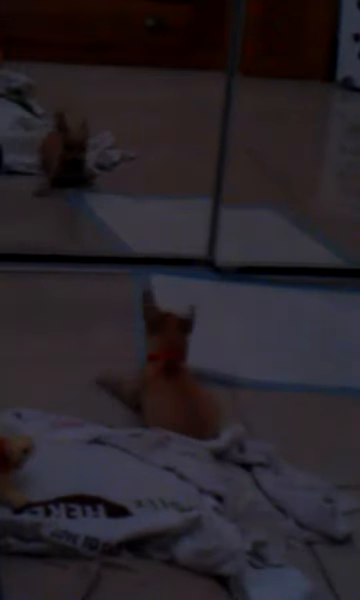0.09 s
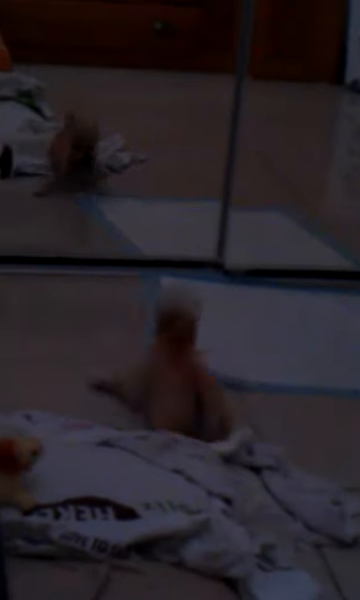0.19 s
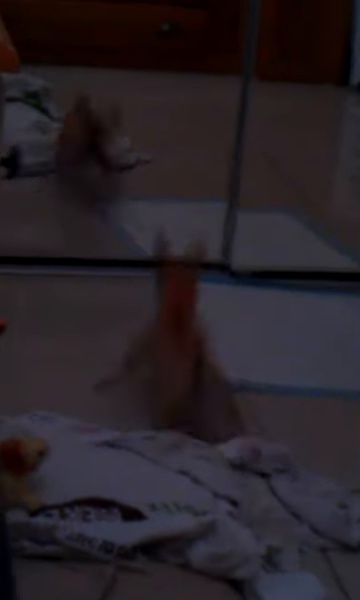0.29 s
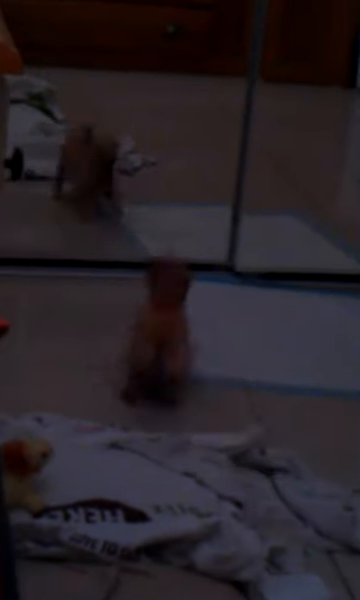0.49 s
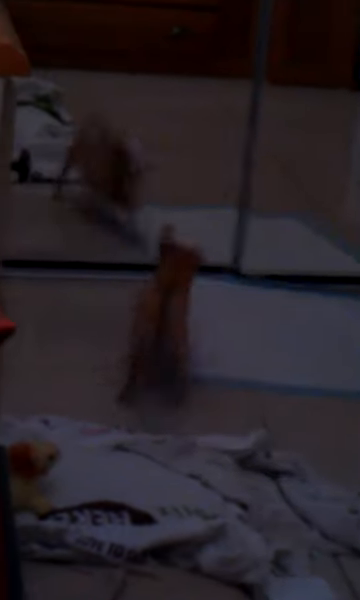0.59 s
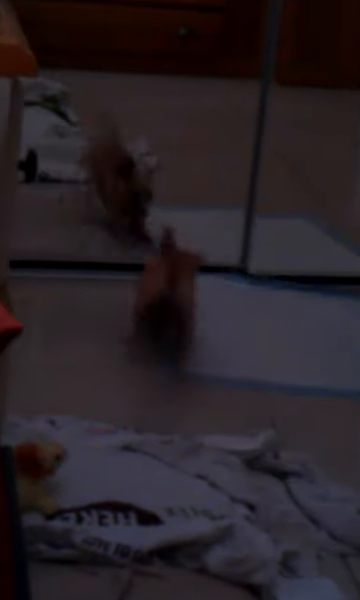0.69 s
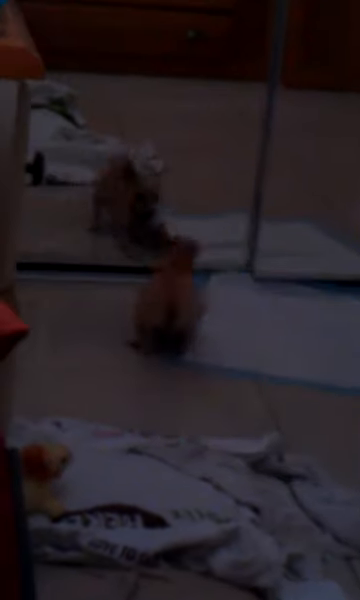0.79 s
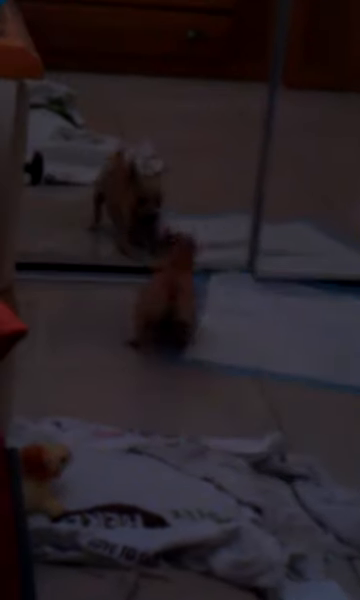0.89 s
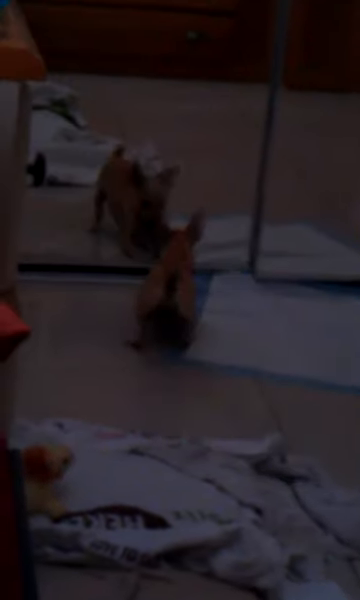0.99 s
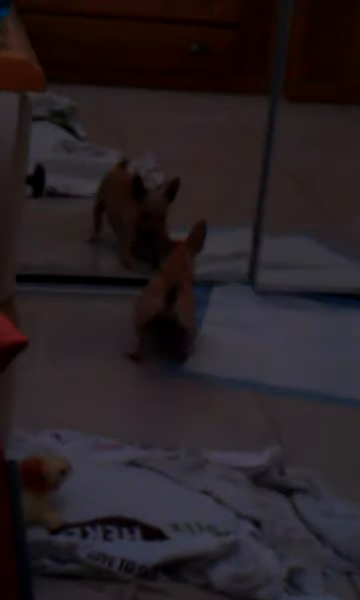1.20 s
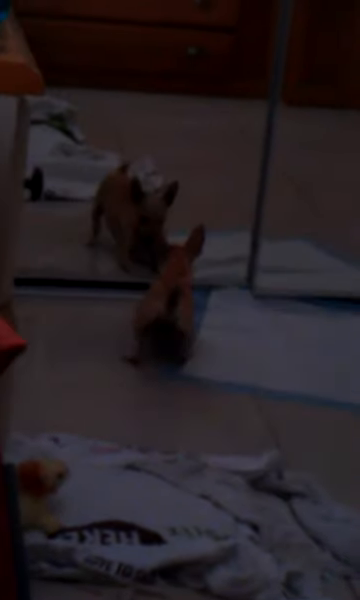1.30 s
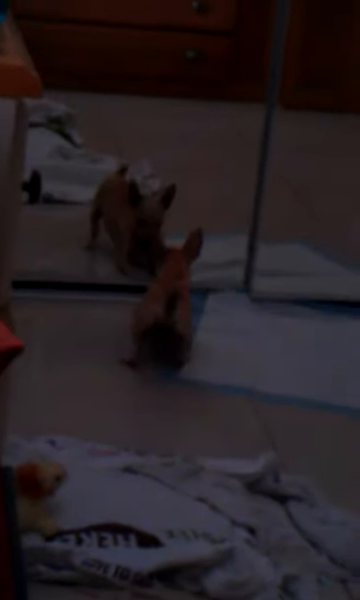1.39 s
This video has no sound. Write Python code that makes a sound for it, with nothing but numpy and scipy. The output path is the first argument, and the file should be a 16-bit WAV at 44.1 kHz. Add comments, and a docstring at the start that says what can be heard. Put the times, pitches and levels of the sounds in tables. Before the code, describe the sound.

Close to the microphone in a quiet room, a small dog lets out two muffled, huffing woofs, the second softer. Between and after them its paws scuff and slide on the hard floor, with claw ticks and light steps.

```python
"""A small dog gives two muffled, closed-mouth woofs, each with a puff of air through the nose.
Between and after them it jumps up, paws scuffing and sliding, then settles with a few light steps.
The place is a quiet, hard-floored room with faint background noise. A small microphone with a peak
in the high treble stands near enough for the dog to be louder than its reverberation."""
import sys
import numpy as np
from scipy import signal
from scipy.fft import rfft, irfft
from scipy.io import wavfile
from scipy.ndimage import uniform_filter1d

SR = 44100
rng = np.random.default_rng(int(sys.argv[2]) if len(sys.argv) > 2 else 0)


def file_out(sig):
    """Save sig as 16-bit WAV at sys.argv[1]."""
    # one column per channel
    cols = np.atleast_2d(sig).T
    # limit, then scale
    lim = np.clip(cols, -1, 1)
    pcm = np.round(lim * 32767).astype(np.int16)
    wavfile.write(sys.argv[1], SR, pcm)


N = 63945
T = np.arange(N) / SR


def from_db(db):
    """Decibels to gain."""
    return 10 ** (np.asarray(db) / 20)


def rms_one(x):
    """Scale to unit rms."""
    return x / np.sqrt(np.mean(x ** 2) + 1e-20)


def at_hz(points, hz):
    """Read a table on a log-frequency axis."""
    freqs, values = np.transpose(points)
    return np.interp(np.log(np.maximum(hz, 1)), np.log(freqs), values)


def colour(x, spectrum):
    """Give a steady excitation a spectrum; rms 1."""
    gains = from_db(at_hz(spectrum, np.fft.rfftfreq(N, 1 / SR)))
    return rms_one(irfft(rfft(x) * gains, N))


def noise(spectrum):
    """Coloured noise, rms 1."""
    return colour(rng.standard_normal(N), spectrum)


def cut(x, hz, kind, order):
    """Butterworth filter."""
    return signal.sosfilt(signal.butter(order, hz, kind, fs=SR, output="sos"), x)


def resonate(x, hz, width_hz):
    """One resonance with gain 1 at its peak."""
    r = np.exp(-np.pi * width_hz / SR)
    feedback = [1, -2 * r * np.cos(2 * np.pi * hz / SR), r * r]
    return signal.lfilter(np.array([1, 0, -1]) * (1 - r * r) / 2, feedback, x)


def dying(age, t60):
    """Exponential decay from age zero, 60 dB in t60 seconds."""
    return np.exp(-np.log(1000) * np.maximum(age, 0) / t60)


def envelope(start, attack, hold, release):
    """Straight rise, hold, exponential fall."""
    return np.clip((T - start) / attack, 0, 1) * dying(T - start - attack - hold, release)


def hits(rows, t60):
    """Sudden rises that die away."""
    return sum(from_db(db) * (T >= start) * dying(T - start, t60) for start, db in rows)


# The room's background. Each row: frequency in Hz, relative level in dB.
ROOM_TONE_SPECTRUM = [(20, -17.5), (58, 0), (85, -8), (125, -0.5), (250, -3.5), (600, -4), (1200, -8),
                      (2500, -13), (5000, -16), (8000, -22.5), (12000, -19), (16000, -16)]
def room_tone(level_db=-64):
    """Faint, steady noise of the quiet room."""
    return from_db(level_db) * noise(ROOM_TONE_SPECTRUM)


# How long the room rings. Each row: frequency in Hz, seconds to fall 60 dB.
ROOM_DECAY = [(150, 0.2), (600, 0.4), (2000, 0.68), (8000, 0.23), (16000, 0.14)]
def reverberation(x, delay_s=0.0038, swell_s=0.029):
    """Diffuse reflections swell, then die at their own rate in each octave."""
    edges = np.geomspace(70, 18000, 9)
    swell = np.clip((T - delay_s) / swell_s, 0, 1)
    tail = 0
    for low, high in zip(edges, edges[1:]):
        fade = swell * dying(T, at_hz(ROOM_DECAY, np.sqrt(low * high)))
        band = cut(rng.standard_normal(N), [low, high], "band", order=2) * fade
        tail = tail + rms_one(band) * np.sqrt(2 * (high - low) / SR / N)  # equal energy per Hz
    return signal.fftconvolve(x, tail)[:N]


# A paw's thud. Each row: frequency in Hz, relative level in dB.
THUD_SPECTRUM = [(40, -5), (70, -0.5), (130, 1), (230, 0), (360, 3.5), (480, -2), (680, -1.5), (1100, -17),
                 (3000, -28), (16000, -50)]
# Paws landing. Each row: start in seconds, level in dB.
FOOTFALLS = [(.325, -51), (0.523, -58), (.788, -51.5), (.815, -57), (.883, -53), (1.318, -57.5)]
def footfalls():
    """Light steps thud softly on the hard floor."""
    return noise(THUD_SPECTRUM) * hits(FOOTFALLS, t60=0.046)


def friction(spectrum, slips_per_s=2200, spread_db=3, slip_share=0.37):
    """Many tiny slips over a smooth rub."""
    sizes = from_db(spread_db * np.minimum(rng.exponential(1, N), 4)) * rng.choice([-1, 1], N)
    slips = rms_one(sizes * (rng.random(N) < slips_per_s / SR))
    rub = rng.standard_normal(N)
    return colour(np.sqrt(slip_share) * slips + np.sqrt(1 - slip_share) * rub, spectrum)


# A paw sliding, and rasping under pressure. Each row: frequency in Hz, relative level in dB.
SLIDE_SPECTRUM = [(1500, -26.5), (3000, -10), (4500, -4), (6500, -2.5), (8300, 1.5), (10000, -5.5),
                  (12500, -12), (16000, -14.5)]
RASP_SPECTRUM = [(100, -10), (300, 0), (800, 2.5), (2000, 3), (3500, -4), (6000, -3.5), (16000, -18.5)]
# Scuffs across the floor. Each row: start in seconds, level in dB, then attack, hold and
# 60 dB release in seconds, rasp in dB relative to the slide.
PAW_SCUFFS = [(0.339, -59.5, 0.043, 0.036, 0.16, -9.5), (0.492, -54.5, 0.008, 0.026, 0.28, -8.5),
              (.55, -57, 0.084, 0.039, 0.29, -6.5), (0.745, -52, 0.012, 0.02, 0.28, -8.5),
              (0.791, -50, 0.041, 0.043, 0.58, -12), (0.866, -54, 0.08, 0.021, 0.2556, -5),
              (0.949, -51, 0.028, 0.009, 0.2952, -8.5), (1.254, -71, 0.032, .01, .25, -24)]
# Claws striking the floor. Each row: start in seconds, level in dB.
CLAW_TICKS = [(.498, -61), (.504, -43), (.5135, -75), (.524, -66), (.556, -63), (.749, -52), (.76, -42),
              (.817, -42.5), (.902, -60), (.975, -40), (1.403, -62.5)]
def paws():
    """Paws slide brightly, pressure adds a lower rasp, and claws tick."""
    slide, rasp = friction(SLIDE_SPECTRUM), friction(RASP_SPECTRUM)
    scuffs = sum(from_db(db) * envelope(start, *shape) * (slide + from_db(rasp_db) * rasp)
                 for start, db, *shape, rasp_db in PAW_SCUFFS)
    return scuffs + noise(SLIDE_SPECTRUM) * hits(CLAW_TICKS, t60=0.016)


# Hiss at the nostrils. Each row: frequency in Hz, relative level in dB.
NOSTRIL_SPECTRUM = [(1900, -18.5), (2900, -29), (3800, -16.5), (4900, -10.5), (6000, -17.5), (7600, -3.5),
                    (9500, -12), (12000, -15), (16000, -27)]
# Puffs. Each row: start in seconds, level in dB, then attack, hold and 60 dB release in seconds.
NOSE_PUFFS = [(0.193, -51, 0.041, 0.025, 0.43), (0.746, -53.5, 0.017, 0.0054, 0.92)]
def nose_puffs():
    """Air hisses smoothly through the nose with each woof."""
    airflow = sum(from_db(db) * envelope(start, *shape) for start, db, *shape in NOSE_PUFFS)
    return noise(NOSTRIL_SPECTRUM) * airflow


# The throat's resonances. Each row: frequency in Hz, width in Hz, gain in dB.
THROAT_RESONANCES = [(322, 69, -7), (407, 70, -5.5), (613, 254, 3.5), (818, 37, -5), (933, 31, -4.5),
                     (1130, 67, -13), (1490, 120, -16), (1734, 130, -9)]
def vocal_tract(source, muzzle_hz, muzzle_db, muzzle_width_hz=160):
    """Throat and muzzle ring, the nose cuts a notch, and the closed mouth muffles the voice."""
    resonances = THROAT_RESONANCES + [(muzzle_hz, muzzle_width_hz, muzzle_db)]
    voice = sum(from_db(db) * resonate(source, hz, width) for hz, width, db in resonances)
    nasal = voice - resonate(voice, hz=1204, width_hz=890)
    muffled = cut(nasal, 1752, "low", order=22)
    return cut(muffled, 232, "high", order=4)


# The course of each woof. Each row: time in seconds, pitch in Hz, level in dB,
# roughness from 0 to 1, chest tone in dB relative to the voice.
LOUD_CONTOUR = [(0.192, 335, -63, 0.54, -22), (.202, 329.8, -46.5, .35, -18), (.21, 322.3, -48.5, .25, -14),
                (0.215, 308, -36, 0.028, -7), (.226, 293, -36, 0.35, -4), (0.239, 266.5, -35, 0.21, -12),
                (0.245, 251.5, -39.5, .3, -14), (0.26, 264.1, -39.5, 0.33, -6),
                (.276, 289.4, -40.5, 0.18, -22), (.284, 177.1, -46.5, .7, -9.5),
                (0.301, 167.6, -46, 0.77, -6.5), (0.317, 167.5, -53, 0.41, -9.5),
                (0.332, 168.2, -47.5, 1, -18), (0.398, 164, -67, 0.99, -18)]
SOFT_CONTOUR = [(0.733, 231.1, -83, 0.7, -20), (.745, 224.3, -56.5, 0.77, -18),
                (0.757, 221, -57.5, 0.45, -15), (.77, 220.4, -43, 0.084, -7.5),
                (0.783, 209, -54, 0.32, -24), (0.794, 194.6, -53, 0.38, -2), (0.813, 202, -69, 0.52, -6)]
def woof(contour, muzzle_hz, muzzle_db, jitter=0.0692):
    """Unsteady vocal pulses and pulsing air drive the tract; the chest radiates the fundamental."""
    times, *columns = np.transpose(contour)
    hz, db, rough, chest_db = [np.interp(T, times, column) for column in columns]
    wobble = rms_one(cut(rng.standard_normal(N), 140, "low", order=2))
    phase = 2 * np.pi * np.cumsum(hz * (1 + jitter * rough * wobble)) / SR
    pulses = rms_one(sum(np.cos(k * phase) for k in range(2, 12)))
    air = rms_one(cut(rng.standard_normal(N), 3440, "low", order=4) * (1 + 0.52 * np.cos(phase)))
    source = np.sqrt(1 - rough) * pulses + np.sqrt(rough) * air
    voice = vocal_tract(source, muzzle_hz, muzzle_db)
    voice /= np.sqrt(uniform_filter1d(voice ** 2, size=500) + 1e-12)  # the contour sets the level
    chest = from_db(chest_db) * np.sin(phase)
    return (voice + chest) * from_db(db) * (T > times[0]) * (T < times[-1])


def scene():
    """The dog and its room from the microphone's position, the same in both channels."""
    loud_woof = woof(LOUD_CONTOUR, muzzle_hz=530, muzzle_db=0.5)
    soft_woof = woof(SOFT_CONTOUR, muzzle_hz=645, muzzle_db=4.5)
    dull = loud_woof + soft_woof + footfalls()
    bright = nose_puffs() + paws()
    reflections = reverberation(from_db(-6) * dull + from_db(-6.5) * bright)
    mono = dull + bright + reflections + room_tone()
    return np.array([mono, mono])


def record(dry):
    """The small microphone's port rings in the high treble; the very top is cut."""
    port_ring = 2.01 * resonate(dry, hz=8360, width_hz=1740)
    top_cut = signal.ellip(10, 0.2, 70, 15850, fs=SR, output="sos")
    return signal.sosfilt(top_cut, dry + port_ring)


dry = scene()
out = record(dry)
file_out(out)
```